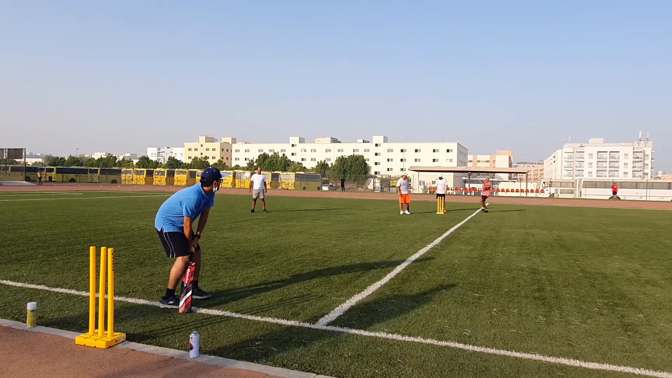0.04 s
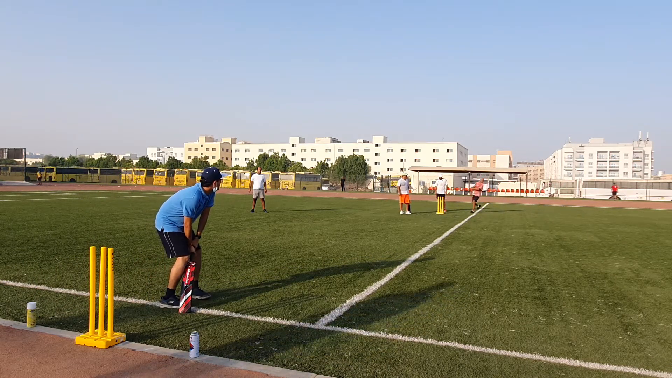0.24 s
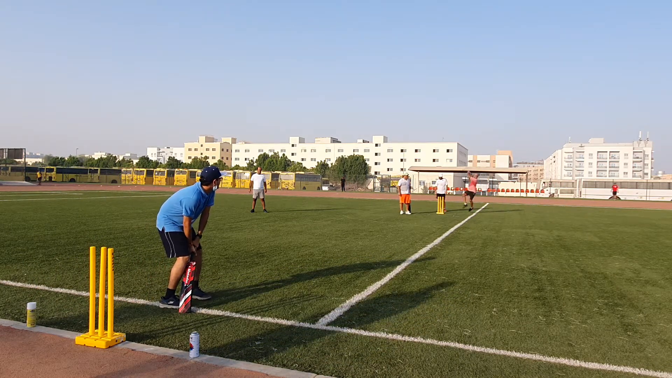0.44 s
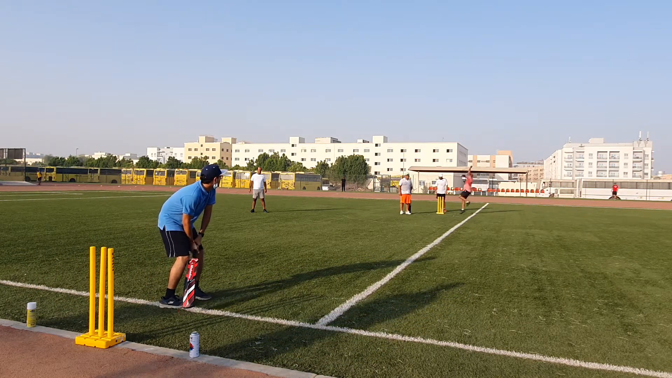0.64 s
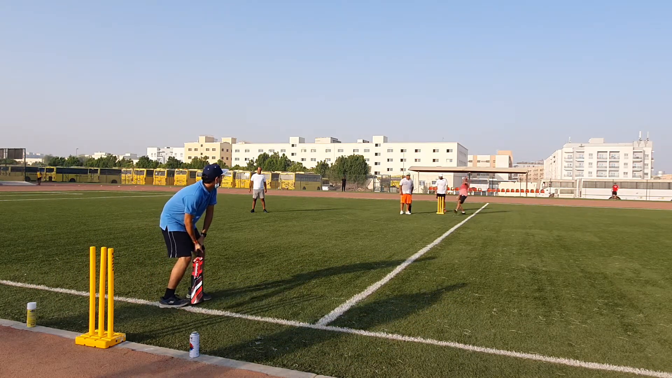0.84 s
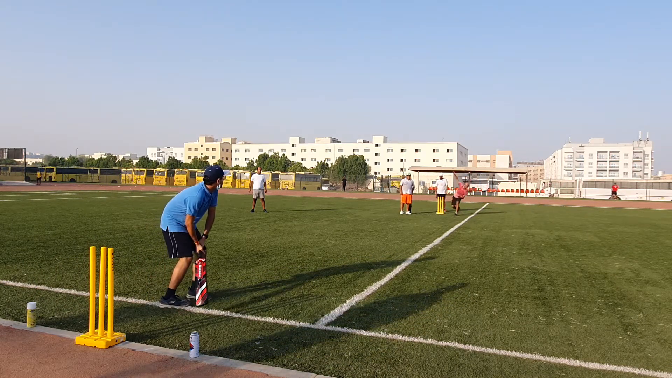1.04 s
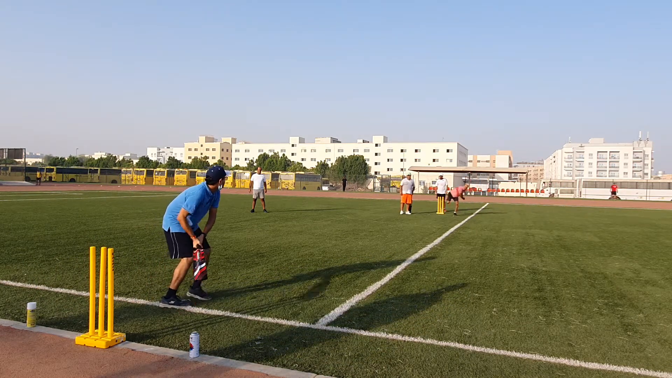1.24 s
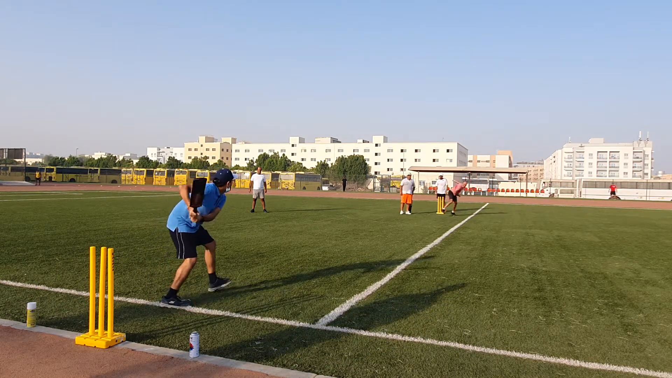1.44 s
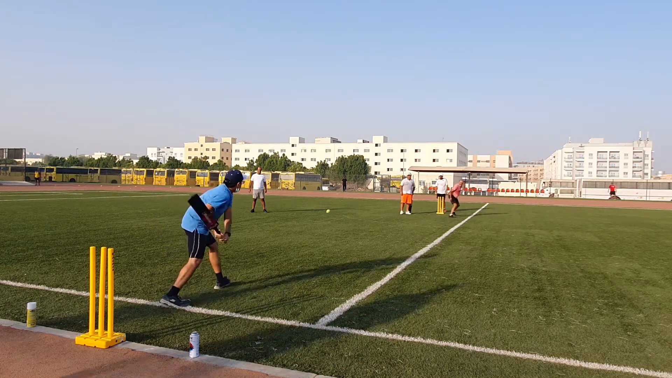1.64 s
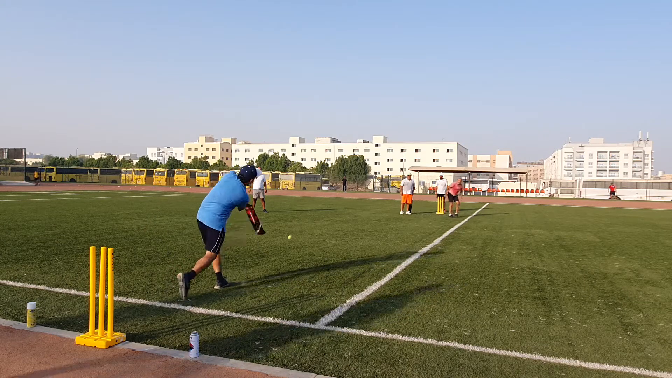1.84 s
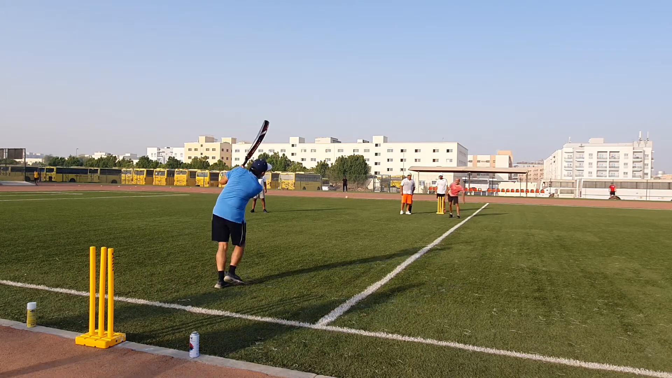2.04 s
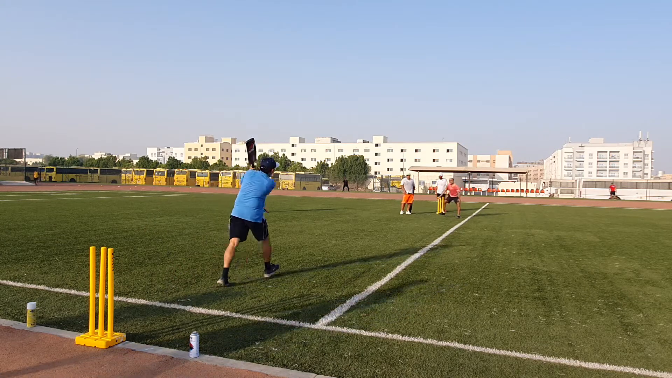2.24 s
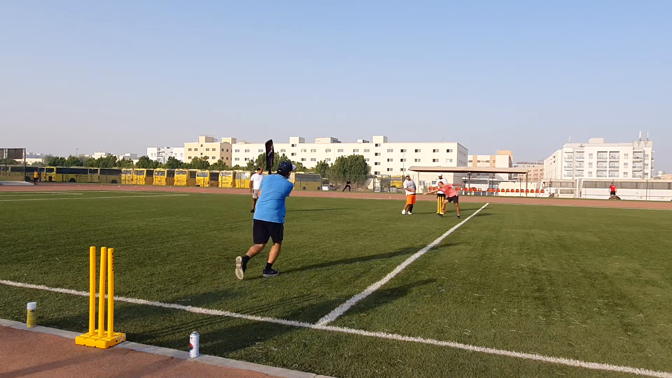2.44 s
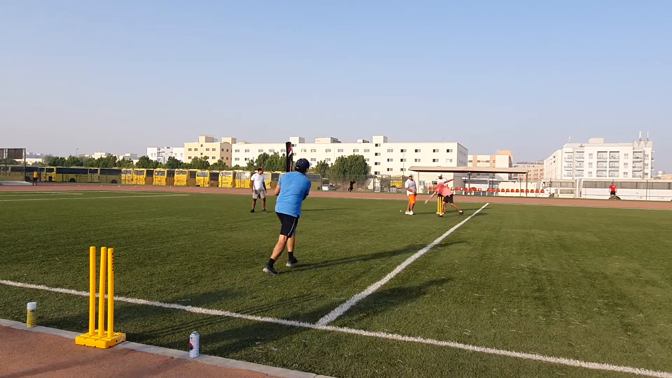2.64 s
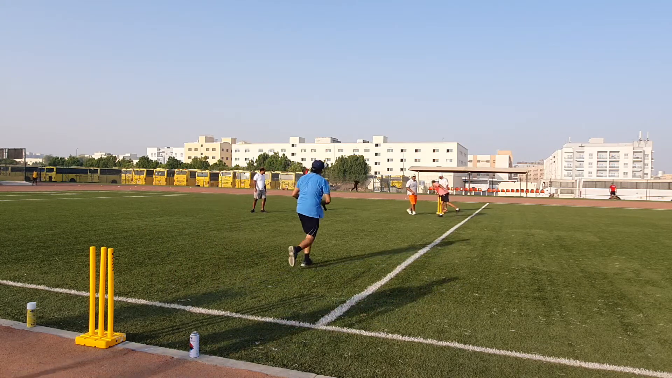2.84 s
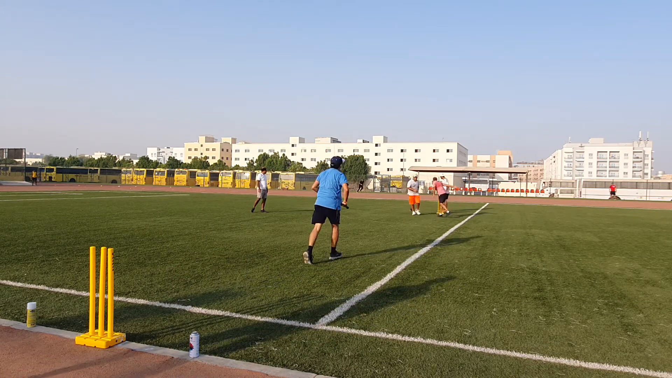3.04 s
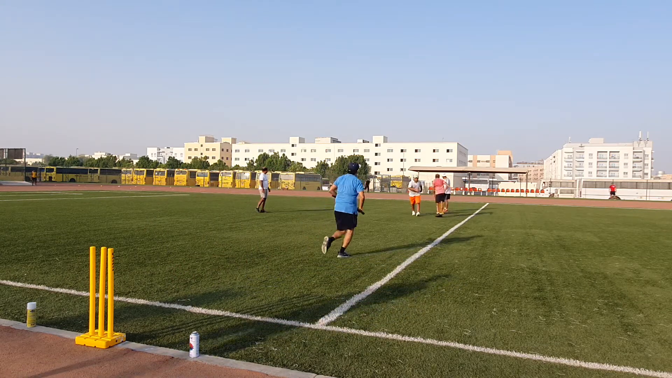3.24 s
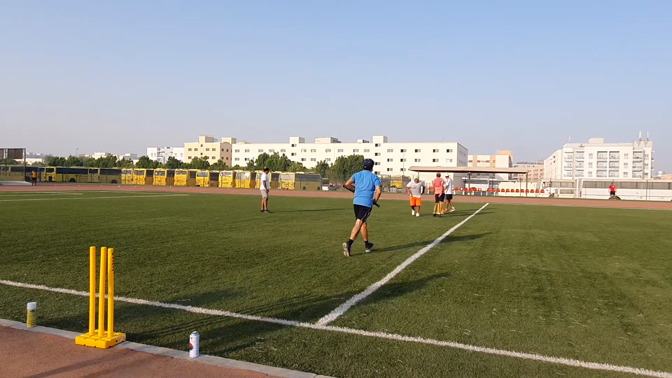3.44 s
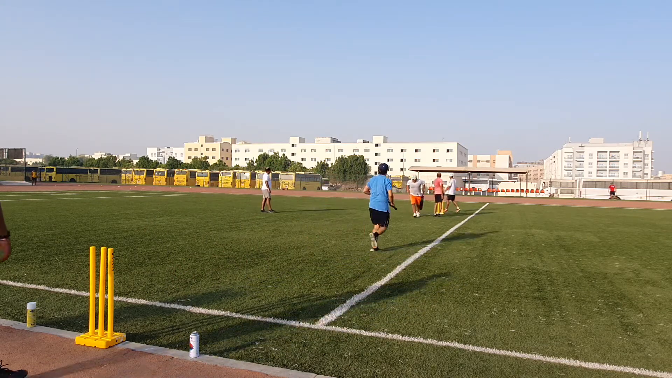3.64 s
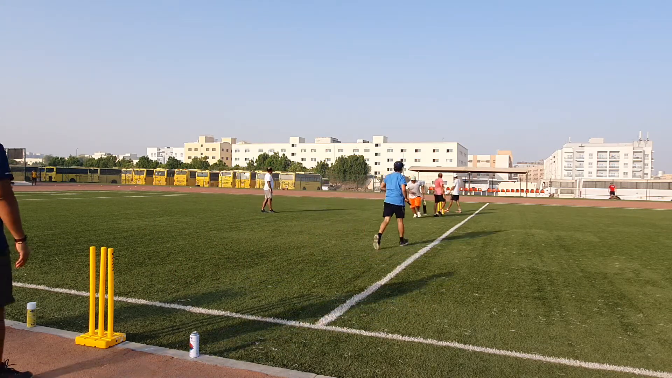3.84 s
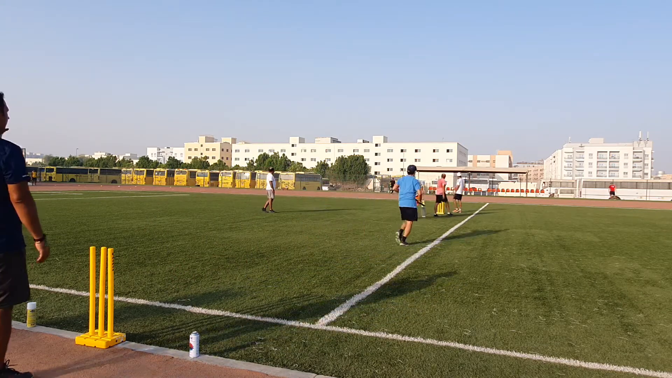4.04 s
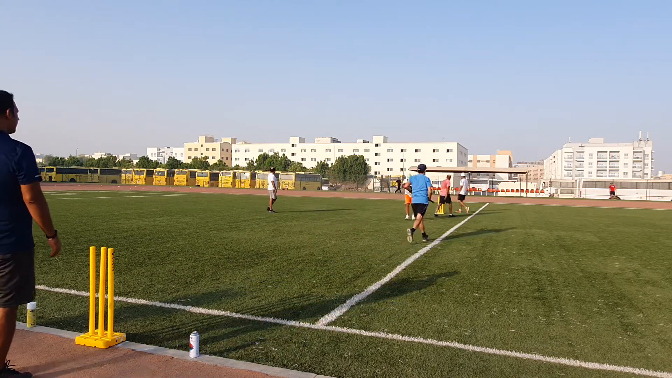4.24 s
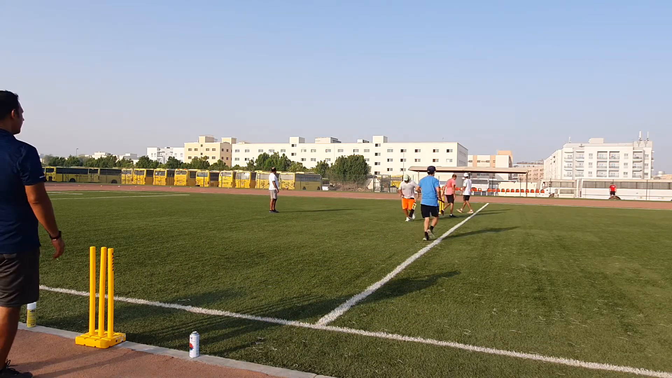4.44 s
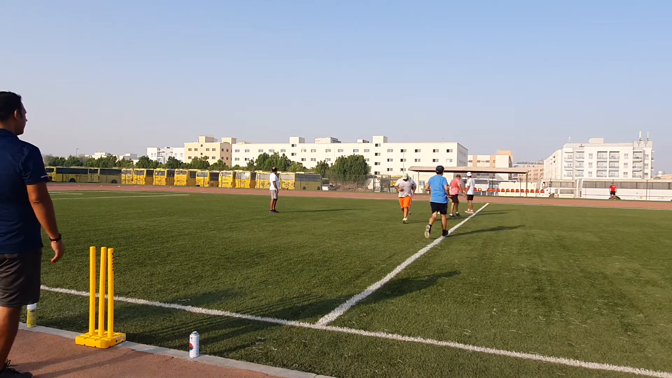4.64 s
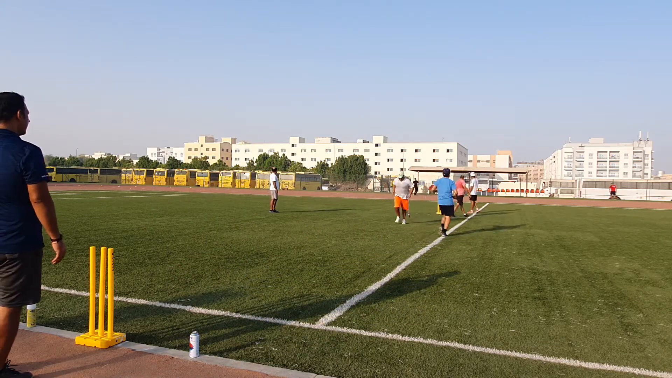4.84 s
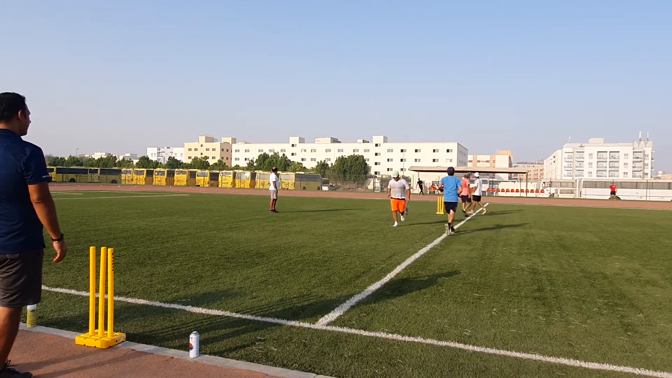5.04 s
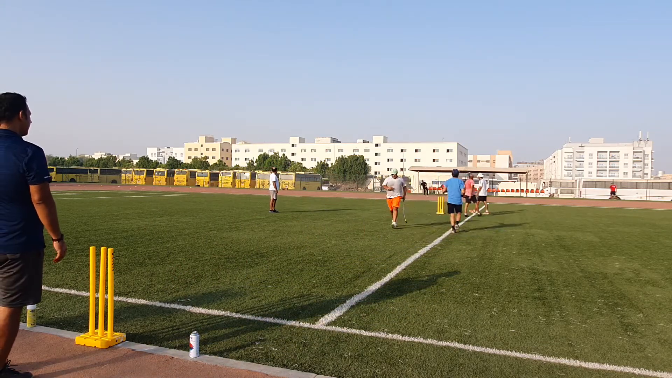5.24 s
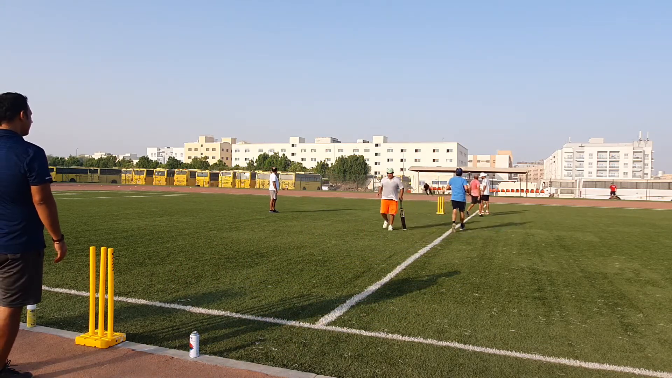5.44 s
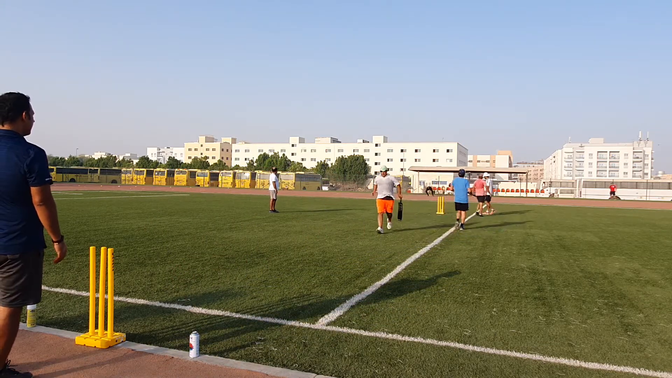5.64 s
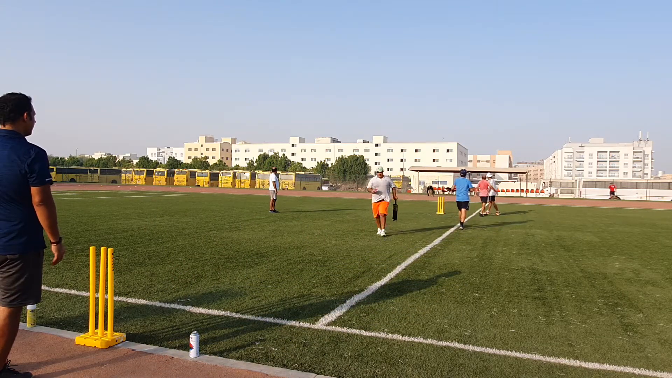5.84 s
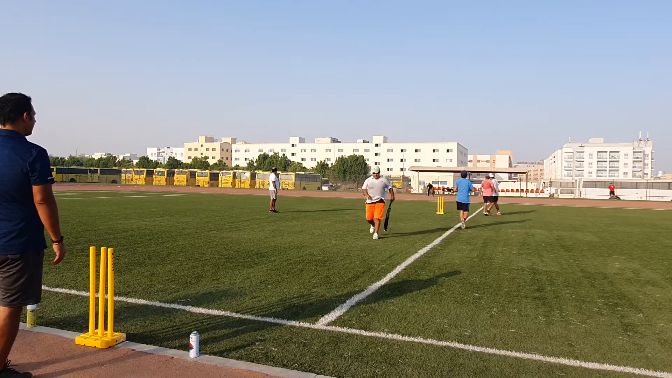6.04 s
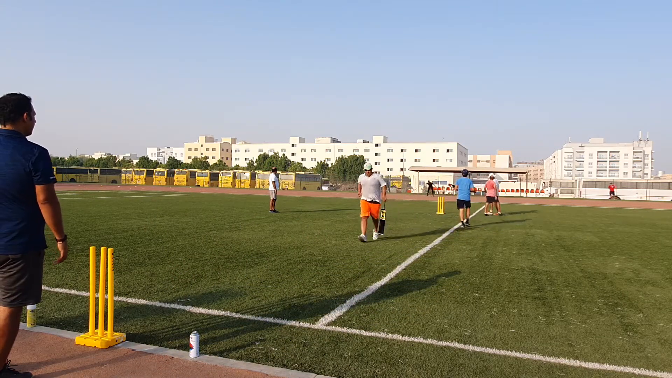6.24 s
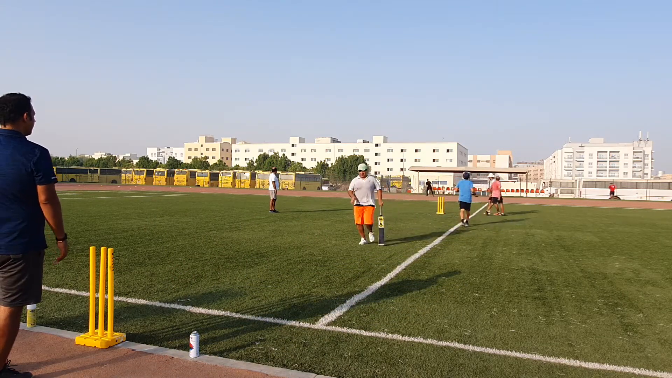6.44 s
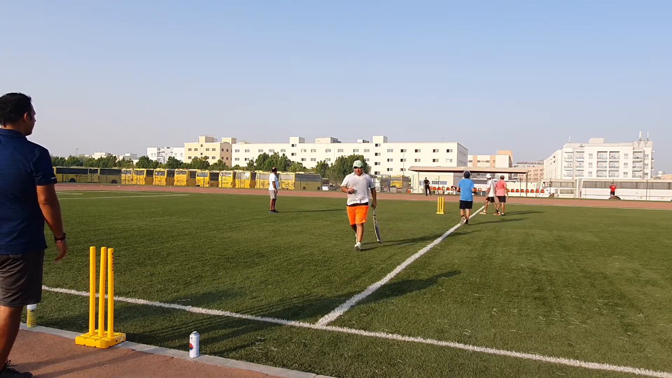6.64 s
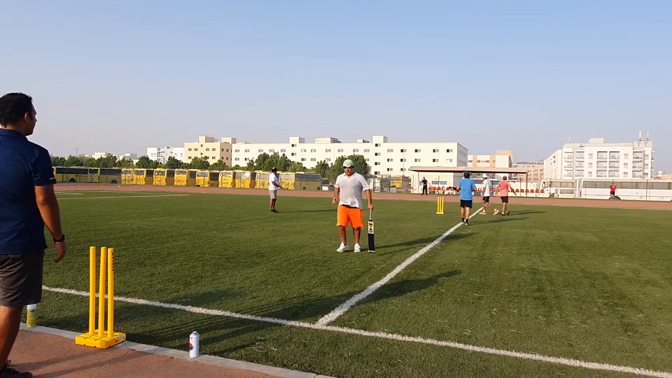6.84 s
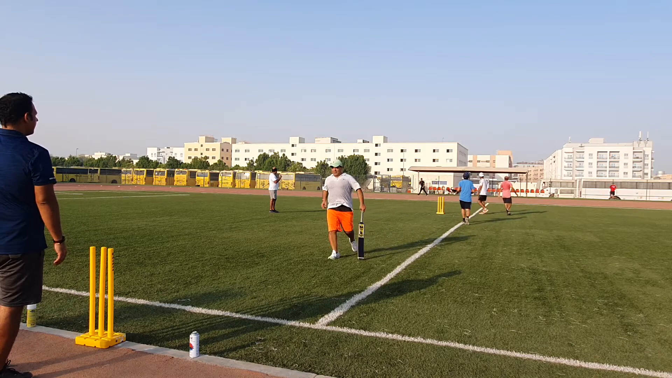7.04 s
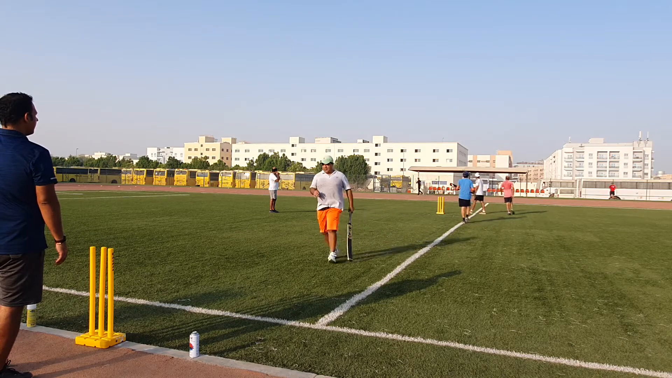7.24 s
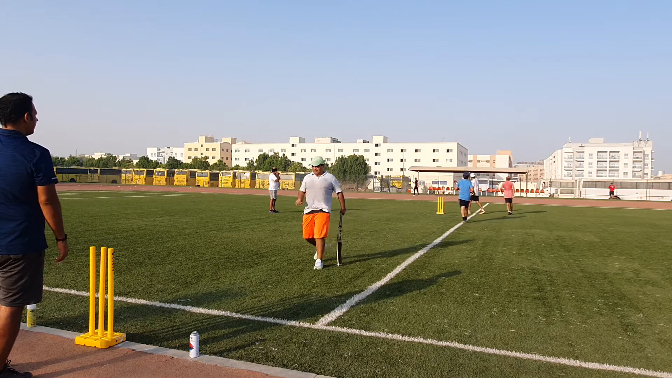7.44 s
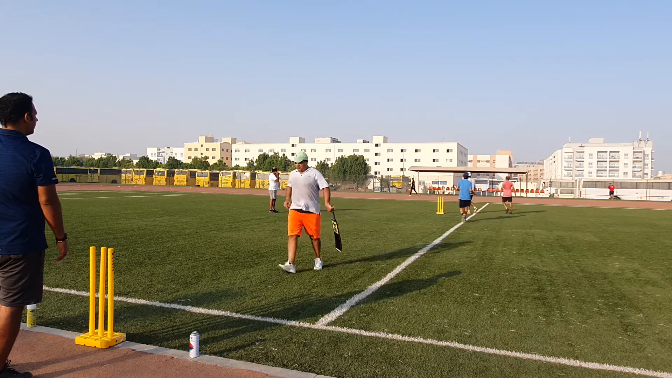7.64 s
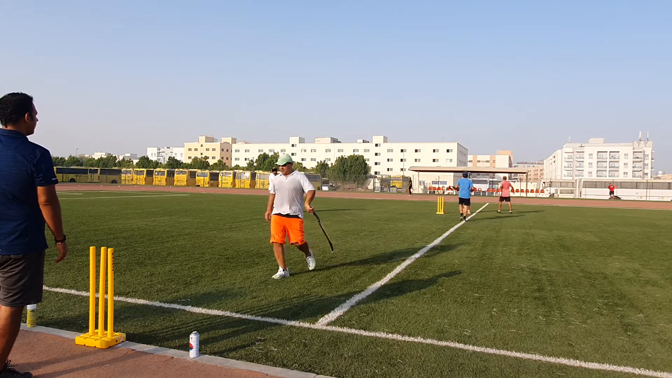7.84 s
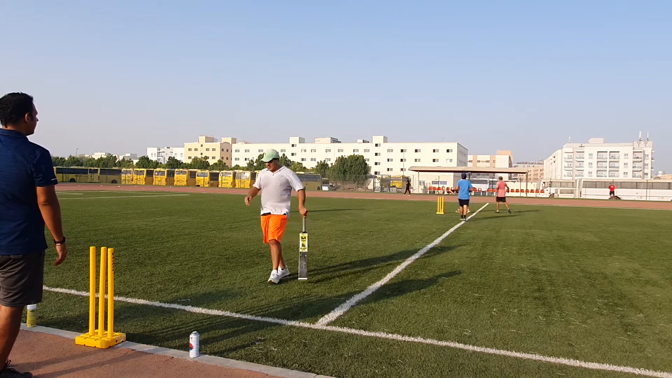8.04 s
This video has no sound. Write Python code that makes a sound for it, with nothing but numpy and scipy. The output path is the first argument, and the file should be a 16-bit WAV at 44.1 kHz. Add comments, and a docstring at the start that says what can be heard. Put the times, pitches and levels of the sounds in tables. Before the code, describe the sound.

One loud, dry bat crack leaps from a quiet outdoor wash of traffic and engine drone, followed by a faint knock and gritty footsteps.

```python
"""On an artificial-turf pitch a ball lands and a wooden bat cracks it away, a few metres from a two-port microphone.
The crack is a bank of decaying blade modes with short echoes, then a faint, duller knock from the same modes;
the landing is a low thump, a pressure dip and a rasp. To the left, shoes scuff and tick: grit noise, short snaps.
Behind lie the wash of road and town (drifting noise spectra) and a heavy engine's drone (a sine and narrow noise),
with a thin whine of narrow noise above it, stronger on the right, and a faint steady hum."""
import sys
import numpy as np
from scipy import signal
from scipy.io import wavfile
from scipy.ndimage import uniform_filter1d

SR = 44100
rng = np.random.default_rng(int(sys.argv[2]) if len(sys.argv) > 2 else 0)


def store_wav(level_fs):
    """Save 16-bit WAV to argv[1]."""
    pcm = np.round(np.clip(np.atleast_2d(level_fs), -1, 1) * 32767)
    wavfile.write(sys.argv[1], SR, pcm.T.astype(np.int16))


N = 357642
T = np.arange(N) / SR


def gain_of(db):
    """Decibels to a factor."""
    return 10 ** (np.asarray(db) / 20)


def evened(x):
    """Scales to rms 1."""
    return x / np.sqrt(np.mean(x ** 2) + 1e-20)


def read(points, hz):
    """Reads a spectrum on a log-frequency axis."""
    point_hz, value = np.transpose(points)
    return np.interp(np.log(hz + 1), np.log(point_hz + 1), value)


def glide(points, s):
    """Reads a two-column time curve, straight between its points."""
    return np.interp(s, *np.transpose(points))


def band(x, lo_hz, hi_hz):
    """Band-pass, rms 1."""
    return evened(signal.sosfilt(signal.butter(2, [lo_hz, hi_hz], "band", fs=SR, output="sos"), x))


def resonate(x, hz, width_hz):
    """Shifts the frequency curve hz down to zero, smooths, and shifts back: a resonance of gain 1."""
    turn = np.exp(2j * np.pi * np.cumsum(hz * np.ones(x.shape[-1])) / SR)
    r = np.exp(-np.pi * width_hz / SR)
    smooth = signal.lfilter([1 - r], [1, -r], x / turn + 1e-18)
    return 2 * (turn * smooth).real


def narrow(x, hz, width_hz):
    """A resonance applied twice, for steep sides; rms 1."""
    return evened(resonate(resonate(x, hz, width_hz), hz, width_hz))


def add(mix, s, sound, lead, shade_db, shade_hz=1500):
    """Lays a sound into both ports; the far one gets it later by the lead and with its treble shaded."""
    low = signal.sosfilt(signal.butter(1, shade_hz, fs=SR, output="sos"), sound)
    far = low + gain_of(-shade_db) * (sound - low)
    near_side = int(lead < 0)  # a positive lead puts the source on the left
    for side, shift, heard in ((near_side, -abs(lead), sound), (1 - near_side, abs(lead), far)):
        part = mix[side, round(s * SR + shift / 2):][:len(sound)]
        part += heard[:len(part)]


# The swell of road and town. Each row: time in seconds, level in dB, treble lift in dB
# (the lift grows with frequency, half of it at 2500 Hz).
ROAD_SWELL = [(0, -41.5, 2), (1.301, -41.5, 0), (1.749, -41.5, 6), (2.7, -39.5, 1.5), (4.2, -38.5, 2.5),
              (5.999, -39, 0.96), (7.4, -40, 4), (8.11, -38.5, 0)]
# Tone colour of the wash. Each row: frequency in Hz, relative density in dB per Hz.
WASH_SPECTRUM = [(12, -42.5), (20, 4), (68, 0), (96, -6.5), (138, -15), (204, -11.5), (337, -18.5),
                 (678, -23.5), (923, -30), (1370, -29.5), (2910, -42), (8410, -67.5), (9140, -97.5),
                 (9950, -78), (16000, -76)]
# How alike the two ports are. Each row: frequency in Hz, left-right likeness from 0 to 1.
LIKENESS = [(60, 0.85), (200, 0.95), (450, 0.49), (1000, 0.29), (2500, 0.1), (6000, 0.33), (12000, .1)]
# Bearing of the passing traffic. Each row: time in seconds, lead of the right port in samples.
TRAFFIC_BEARING = [(0, 3.5), (2.5, 9), (8.11, 22)]


def road():
    """Random short-time spectra in drifting patches; the shared part reaches the right port first."""
    size, hop = 1024, 256  # samples
    frames, hz = N // hop + 5, np.fft.rfftfreq(size, 1 / SR)
    a, b, c, d, patches = rng.standard_normal((frames, len(hz), 5)).T
    patches = uniform_filter1d(patches, 12, 0)  # across frequency
    patches = evened(uniform_filter1d(patches, 14, 1))  # across time
    s, level_db, lift_db = np.transpose(ROAD_SWELL)
    frame_s = np.arange(frames) * hop / SR
    lift_db, lead = np.interp(frame_s, s, lift_db), glide(TRAFFIC_BEARING, frame_s)
    early = np.exp(2j * np.pi * hz[:, None] * lead / SR)
    same = np.clip(read(LIKENESS, hz), 0, 1)[:, None]
    left = a + 1j * b
    right = same * left * early + np.sqrt(1 - same ** 2) * (c + 1j * d)
    colour_db = read(WASH_SPECTRUM, hz)[:, None] + 0.84 * patches
    colour_db = colour_db + lift_db * (hz / (hz + 2500))[:, None]
    spectra = np.array([left, right]) * gain_of(colour_db)
    wash = signal.istft(spectra, nperseg=size, noverlap=size - hop)[1][:, :N]
    return gain_of(np.interp(T, s, level_db)) * evened(wash)


# A steady hum: frequency in Hz, level in dB of its sine.
HUM = (301.5, -58)


def hum():
    """One steady sine with a little narrow noise around it."""
    hz, db = HUM
    haze = narrow(rng.standard_normal(N), hz, 3)
    return gain_of(db) * (np.sin(2 * np.pi * hz * T) + 0.22 * haze)


# The gliding whine. Each row: time in seconds, frequency in Hz, level in dB before the flutter.
WHINE = [(0, 9400, -112), (1.4, 9400, -110), (1.8, 9500, -91.5), (3.3, 9320, -94), (4.15, 9330, -85.5),
         (4.449, 9070, -89), (6.8, 9010, -84.5), (7.401, 8520, -98), (7.802, 8840, -97),
         (8.11, 8900, -92.5)]


def whine(flutter_noise):
    """Narrow noise on a gliding pitch, partly shared by the ports; it comes and goes with the air."""
    s, hz, db = np.transpose(WHINE)
    shared, own = rng.standard_normal((2, N))
    flutter = gain_of(1.6 * evened(uniform_filter1d(flutter_noise, 4000)))
    tones = [flutter * narrow(n, np.interp(T, s, hz), 280) for n in (shared, .5 * shared + own)]
    return gain_of(np.interp(T, s, db) + [[0], [3]]) * tones  # 3 dB stronger on the right


# Firing rate of the engine. Each row: time in seconds, frequency in Hz.
FIRING = [(0, 77.2), (1.2, 78.25), (4.3, 87.25), (6, 87.34), (8.11, 83.84)]
# Fader for the drone. Each row: time in seconds, base level in dB before the waver.
ENGINE_LEVEL = [(0, -43.5), (.3, -40), (.72, -45.5), (.92, -33.5), (1.02, -41.5), (1.22, -36), (1.5, -40),
                (1.95, -42), (2.7, -32.5), (3.07, -36.5), (3.2, -30.5), (3.45, -38), (3.95, -38.5),
                (4.7, -36), (6.1, -37), (6.6, -42.5), (6.95, -39.5), (7.39, -31), (7.68, -37),
                (8.11, -30.5)]
# Orders beside the firing tone. Each row: multiple of the firing rate, level in dB before the engine fader.
# The table's levels ride on a slow, one-second average of that fader.
ORDERS = [(0.502, -28.5), (.75, -25), (1.498, -23), (1.999, -21.5), (2.502, -22.5)]
WAVER_HZ, WAVER_DB = 5.4, 1.5  # fastest swell, rms depth


def engine():
    """Firing tone with its orders, blurred by the air on the long path; whine and hum go with it."""
    hz = glide(FIRING, T)
    tone_noise, order_noise = rng.standard_normal((2, N))
    # the air makes the drone swell and sink at random
    waver = sum(np.sin(2 * np.pi * (f * T + rng.random())) for f in np.geomspace(.2, 1, num=20) * WAVER_HZ)
    level = gain_of(glide(ENGINE_LEVEL, T) + WAVER_DB * evened(waver))
    drone = 1.25 * np.sin(2 * np.pi * np.cumsum(hz) / SR) + 0.089 * narrow(tone_noise, hz, 13)
    orders = sum(gain_of(db) * narrow(order_noise, k * hz, 3.5) for k, db in ORDERS)
    return level * drone + uniform_filter1d(level, SR) * orders + hum() + whine(order_noise)


# Where scuffs and ticks sit. Each row: time in seconds, lead of the left port in samples.
TURF_BEARING = [(.4, 14.5), (1.2, 9.2), (1.8, 6.5), (2.15, 13), (4.3, 12), (5.5, 8.2)]
NEAR_SIDE_DB = 7.5  # treble shading of the right port: the left one faces the players


def turf_lead(s):
    """The place of a scuff or tick at a moment, as the left port's lead in samples."""
    return glide(TURF_BEARING, s)


# Shoe scuffs, and the gritty tail of the bat's crack at 1.785 s. Each row: start in seconds, grit level in dB,
# grit frequency in Hz, fizz level in dB, air level in dB, thud level in dB, rise in seconds, hold in seconds.
# Levels are before clumping and fading.
SCUFFS_AND_CRACK_TAIL = [(0.424, -61, 2660, -94, -100, -62, .003, .042),
                         (0.589, -86, 3500, -83, -100, -64, .03, 0.074),
                         (1.141, -92, 3500, -85, -94, -64, 0.017, 0.084),
                         (1.785, -51.5, 3500, -66, -81, -47.5, .003, 0.025),
                         (1.845, -58, 2900, -68, -74, -53, 0.0037, 0.064),
                         (1.921, -68.5, 3960, -76.5, -95, -68, .01, 0.21),
                         (2.116, -56, 3320, -59, -66.5, -51.5, 0.0061, .1),
                         (2.247, -57, 4080, -69, -86, -50, 0.0051, 0.011),
                         (2.355, -50, 3080, -74, -82, -47.5, 0.0055, 0.01),
                         (2.651, -65, 3000, -69.5, -91, -58, .004, 0.055),
                         (2.938, -66, 2940, -67, -89, -52.5, .003, 0.025),
                         (3.426, -69, 3500, -62, -75, -48, .002, 0.013),
                         (3.471, -58.5, 3170, -68, -83, -46.5, .045, .05),
                         (4.259, -47.5, 2860, -66.5, -83, -53, .003, 0.027),
                         (4.294, -52.5, 3100, -74, -83, -49.5, 0.011, 0.022),
                         (5.521, -74, 4000, -71.5, -86, -75, .005, 0.042),
                         (6.193, -67, 4000, -66, -82, -69, .003, .01),
                         (6.228, -60, 3980, -62, -62, -70, .002, 0.017),
                         (6.26, -54.5, 3230, -61, -69, -73, .01, 0.012)]
FADE_S, FADE_PER_RISE = 0.033, 7  # t60 of a scuff: a slow drag also lets go slowly
CLUMP_DB = 3.3  # rms unevenness of the grit


def scuffs_and_crack_tail():
    """Clumped noise: resonant grit, fizz and air above, a thud below; shoe scuffs and the crack's gritty tail."""
    out, t = np.zeros((2, N)), T[:12000]
    for s, grit_db, hz, fizz_db, air_db, thud_db, rise, hold in SCUFFS_AND_CRACK_TAIL:
        t60 = FADE_S + FADE_PER_RISE * rise
        direct, clump_noise, *around = rng.standard_normal((4, len(t)))
        clumps = gain_of(CLUMP_DB * evened(uniform_filter1d(clump_noise, 70)))  # grains catch unevenly
        fade = gain_of(-60 * np.maximum(t - rise - hold, 0) / t60)
        shape = np.clip(t / rise, 0, 1) * fade

        def rub(noise):
            """One burst of grit; the same noise reversed feeds fizz and thud."""
            grit, fibres = noise * clumps, noise[::-1] * clumps
            body = gain_of(grit_db) * narrow(grit, hz, 1900)
            fizz = gain_of(fizz_db) * band(fibres, 6000, 7670)
            air = gain_of(air_db) * band(grit, 10000, 15000)
            thud = gain_of(thud_db) * band(fibres, 330, 1500)
            return shape * (body + fizz + air + thud)

        add(out, s, rub(direct), turf_lead(s), NEAR_SIDE_DB)
        scatter = np.array([rub(n) for n in around])  # unlike at each port
        out[:, round(s * SR):][:, :len(t)] += .5 * scatter
    return out


# Short ticks, and at 1.902 s the bright edge of the later knock. Each row: start in seconds, ring level in dB,
# ring frequency in Hz, broad snap level in dB, lower knock level in dB. Levels are before the decay.
TICKS_AND_KNOCK_EDGE = [(1.219, -69, 8000, -80, -73), (1.6142, -46.5, 3470, -75, -37.5),
                        (1.822, -55.5, 4950, -44.5, -65), (1.9022, -36, 4700, -60, -42),
                        (2.0985, -50.5, 3800, -55, -67), (2.139, -42.5, 3020, -49, -63),
                        (2.213, -46, 3640, -45.5, -56), (2.2635, -43.5, 4100, -69, -57),
                        (2.358, -44, 3180, -70, -49), (2.411, -55, 4900, -73, -64),
                        (2.654, -52, 5800, -77, -65.5), (2.945, -47.5, 3000, -64.5, -47.5),
                        (3.432, -49, 7240, -50, -66), (3.5342, -44.5, 3290, -68, -65),
                        (3.556, -56, 3100, -60, -58), (4.2625, -41.5, 3300, -74, -60),
                        (5.517, -46.5, 6200, -65, -68), (5.554, -43, 7320, -61, -67),
                        (6.231, -35, 5100, -33.5, -31.5), (6.269, -44, 5400, -50, -37),
                        (6.2765, -48, 3200, -50, -63), (6.4854, -53.5, 4860, -81, -71)]
TICK_T60_S = 0.0094
SNAP = 8  # a tick opens with one sharp break, this many times the rms of the grit that follows


def ticks_and_knock_edge():
    """One sharp break and a little grit excite a ring, a broad snap and a lower resonance."""
    out, t = np.zeros((2, N)), T[:1500]
    for s, ring_db, hz, broad_db, knock_db in TICKS_AND_KNOCK_EDGE:
        grit = rng.standard_normal(len(t)) + SNAP * (t == 0)
        snap = gain_of(ring_db) * narrow(grit, hz, 1200)
        snap += gain_of(broad_db) * band(grit, 2800, 11000)
        snap += gain_of(knock_db) * narrow(grit, hz / 2.5, 900)  # a body sounding below the ring
        add(out, s, gain_of(-60 * t / TICK_T60_S) * snap, turf_lead(s), NEAR_SIDE_DB)
    return out


# Turf fibres rasping. Each row: resonance in Hz, width in Hz, relative level in dB.
TURF_FIBRES = [(720, 1200, 9.5), (1410, 620, 5.5), (1810, 410, 1.5), (2800, 580, 13.5), (4200, 980, -6.5),
               (6960, 890, -19.5), (12300, 7000, -40)]
PITCH_S = 1.7677  # centre of the landing
SQUASH_DB, SQUASH_MS = -12, .9  # the ball flattens: a short dip of pressure
THUMP_DB, THUMP_HZ, THUMP_MS = -23, 114.35, 5  # the turf gives and springs back
RASP_DB, RASP_MS = -24, 3.3  # level before its bell-shaped window


def pitch():
    """The ball squashes on the turf: a dip of pressure inside a low thump, and a rasp of fibres."""
    half = 900  # samples either side of the centre
    out, ms = np.zeros((2, N)), 1000 * (np.arange(2 * half) - half) / SR

    def bell(width_ms):
        """Gaussian window around the landing."""
        return np.exp(-.5 * (ms / width_ms) ** 2)

    squash = ((ms / SQUASH_MS) ** 2 - 1) * bell(SQUASH_MS)
    thump = -np.cos(2 * np.pi * THUMP_HZ * ms / 1000) * bell(THUMP_MS)
    noise = rng.standard_normal(len(ms))
    rasp = evened(sum(gain_of(db) * narrow(noise, hz, width) for hz, width, db in TURF_FIBRES))
    landing = gain_of(SQUASH_DB) * squash + gain_of(THUMP_DB) * thump
    landing += gain_of(RASP_DB) * rasp * bell(RASP_MS)
    add(out, PITCH_S - half / SR, landing, 4, 1.5, 7000)
    return out


# The bat's crack, then a faint, duller knock: its echo or the ball bouncing. Each row: start in seconds,
# level in dB, treble tilt in dB per octave about 1 kHz, lead of the left port in samples,
# treble shading of the right port in dB (negative brightens it).
CRACK_AND_KNOCK = [(1.7862, -3, 0.45, 4, -5), (1.9026, -28, -2, 7.8, 24)]
# Modes of the willow blade. Each row: frequency in Hz, relative level in dB, t60 in seconds.
BLADE_MODES = [(170, -8, .028), (280, -9, .022), (470, -7, .014), (575, 0, .025), (820, -12, .016),
               (1160, -9, .018), (1510, -10, .016), (2260, -3, .013), (2750, -3, .009), (3320, -2, .008),
               (3900, 1, .0065), (5240, -9, .008), (6300, -17, .007), (7750, -9, .009), (10000, -21, .008),
               (12700, -20, .008), (14800, -22, .008)]
# Short echoes of crack and knock. Each row: delay in milliseconds, relative level in dB.
ECHOES = [(1.55, -18.5), (3.2, -31.5), (5.1, -23.5), (9.5, -26)]


def crack_and_knock():
    """Blade modes start at once, and ground and body throw them back in milliseconds; the knock reuses them."""
    out, t = np.zeros((2, N)), T[:3000]
    for s, db, tilt_db, lead, shade_db in CRACK_AND_KNOCK:
        ring = np.zeros(len(t))
        for hz, mode_db, t60 in BLADE_MODES:
            decay_db = mode_db + tilt_db * np.log2(hz / 1000) - 60 * t / t60
            ring += gain_of(decay_db) * np.sin(2 * np.pi * hz * t)
        slap, *scatter = (band(n, 170, 3200) for n in rng.standard_normal((3, len(t))))
        ring += gain_of(-9 - 60 * t / 0.015) * slap  # felt and grain slap
        ring *= 1 - np.exp(-(1000 * t / .45) ** 2)  # the soft ball loads the face gradually
        echoes = sum(gain_of(echo_db) * np.interp(t - ms / 1000, t, ring, left=0) for ms, echo_db in ECHOES)
        add(out, s, gain_of(db) * (ring + echoes), lead, shade_db, 7500)
        # scattered by bodies and stumps, unlike at each port and 2 dB stronger on the left
        dying = gain_of(db - 10.5 - 60 * t / 0.029 + [[2], [0]]) * (1 - np.exp(-1000 * t / 0.28))
        out[:, round(s * SR):][:, :len(t)] += dying * scatter
    return out


def scene():
    """All sources at the two ports, from the background to the bat."""
    return road() + engine() + scuffs_and_crack_tail() + ticks_and_knock_edge() + pitch() + crack_and_knock()


def record(dry):
    """The capsule drops the deepest bass; the crack overloads the input softly; then the band limit."""
    held = signal.sosfilt(signal.butter(2, 37, "high", fs=SR, output="sos"), dry)
    held = held / (1 + (held / .93) ** 4) ** .25  # rounds off towards a ceiling of .93
    edge = signal.firwin(511, 16100, window=("kaiser", 9), fs=SR)  # low-pass, Hz
    return signal.oaconvolve(held, edge[None], "same")


dry = scene()
out = record(dry)
store_wav(out)
```